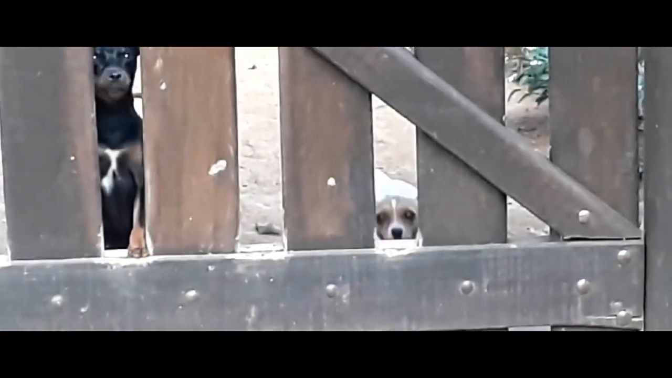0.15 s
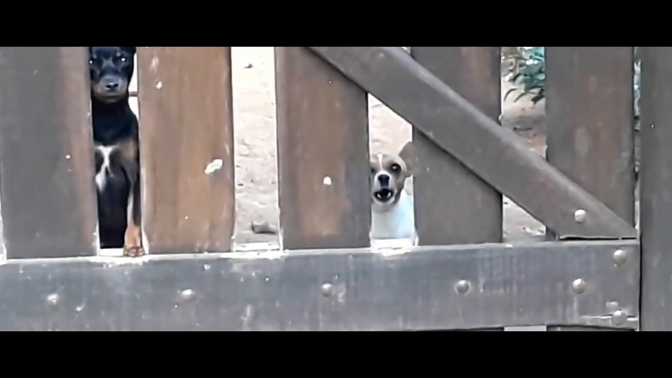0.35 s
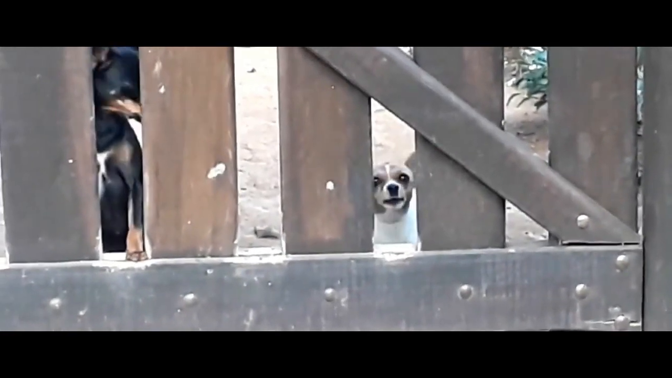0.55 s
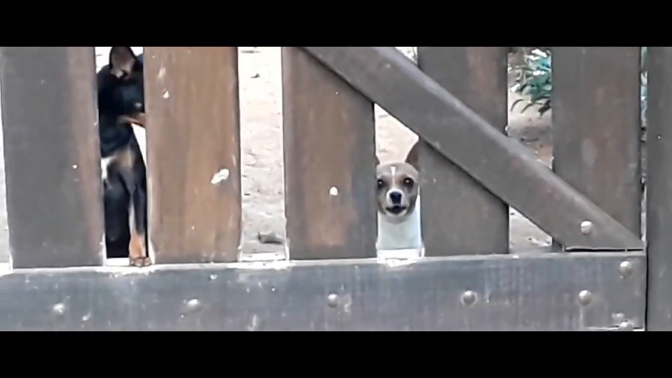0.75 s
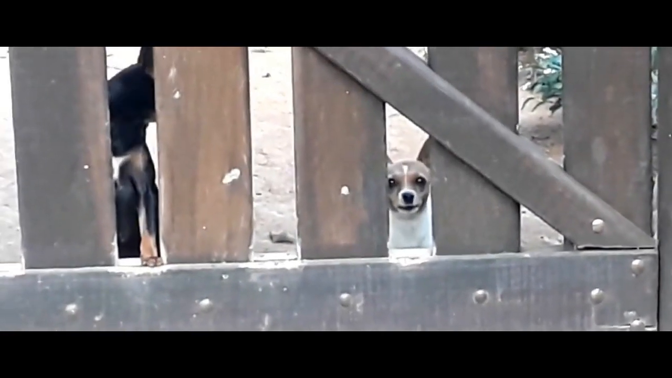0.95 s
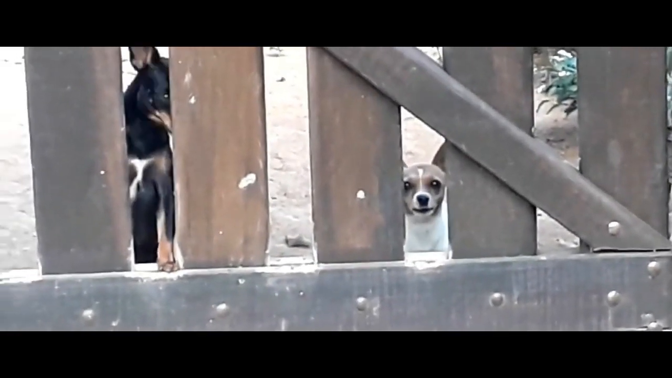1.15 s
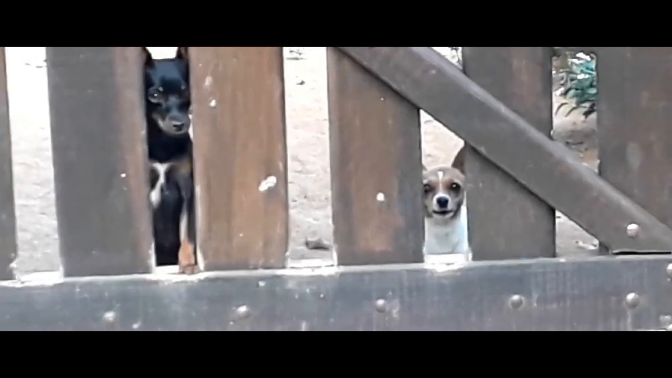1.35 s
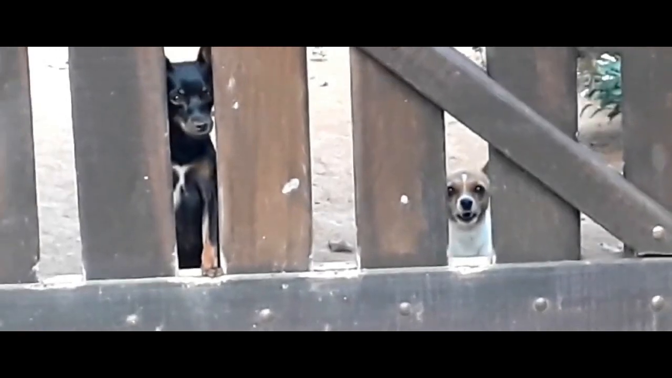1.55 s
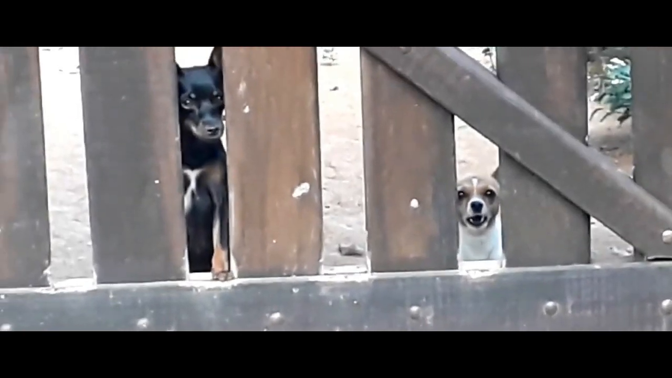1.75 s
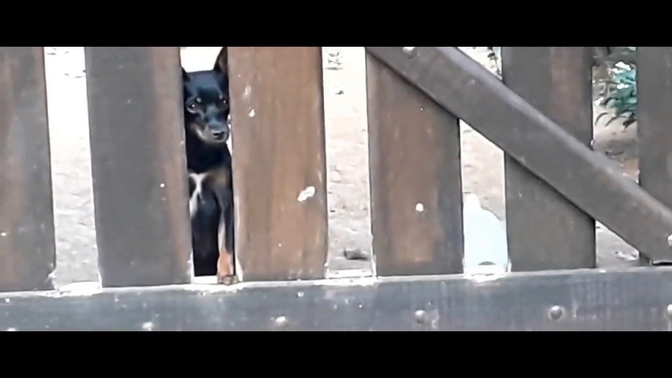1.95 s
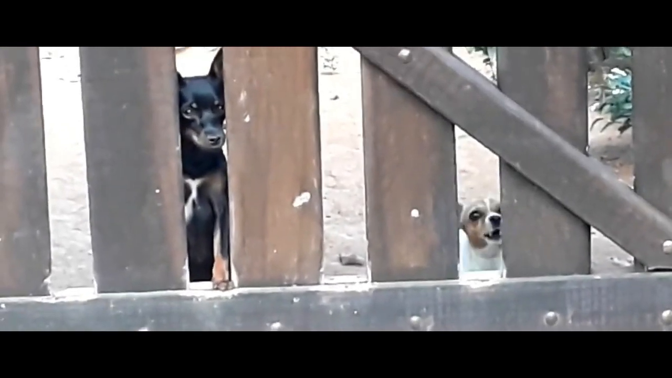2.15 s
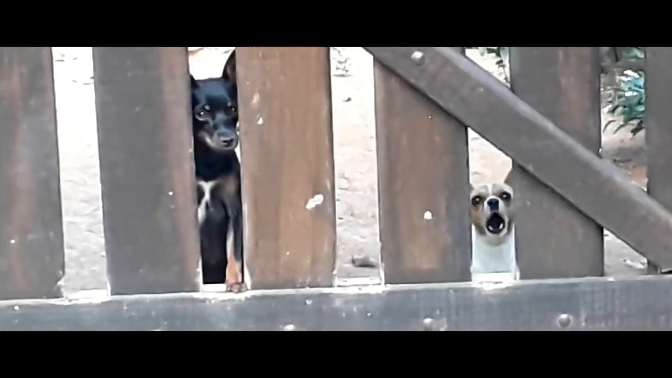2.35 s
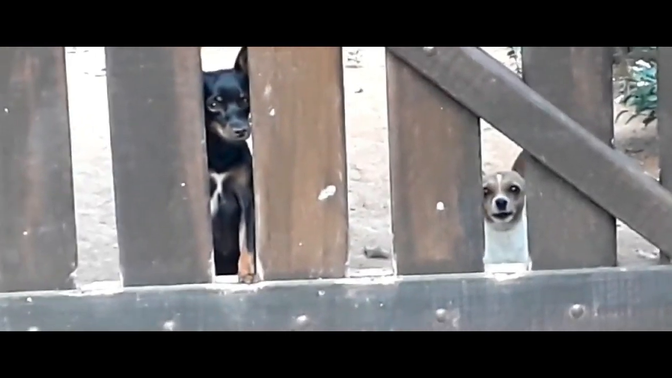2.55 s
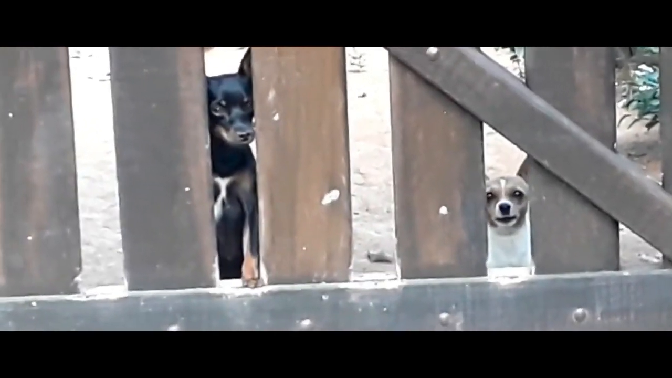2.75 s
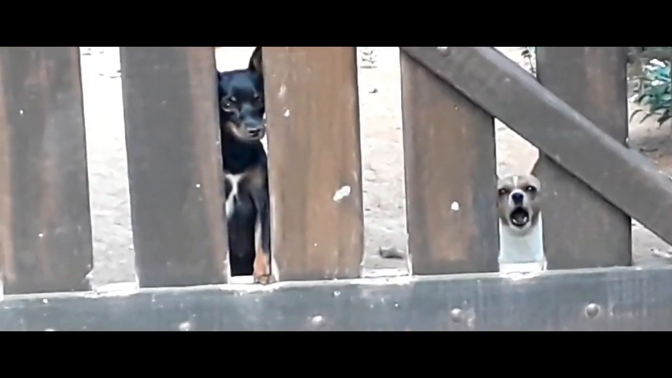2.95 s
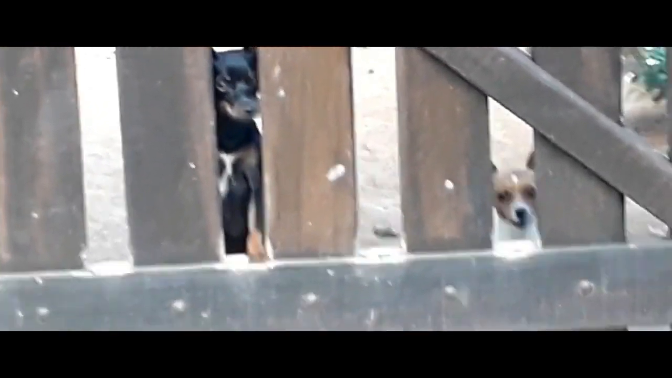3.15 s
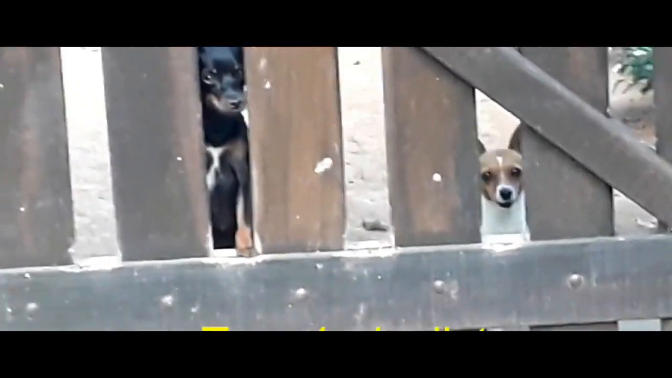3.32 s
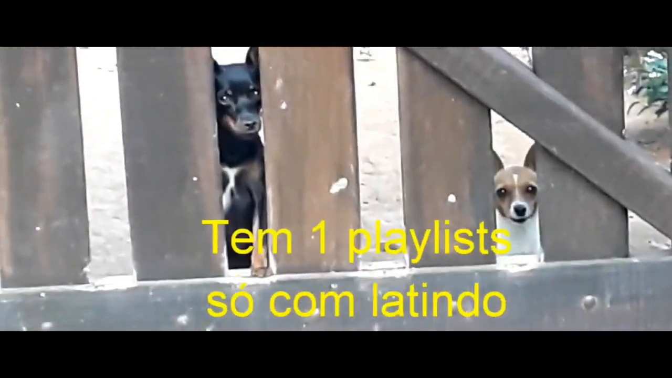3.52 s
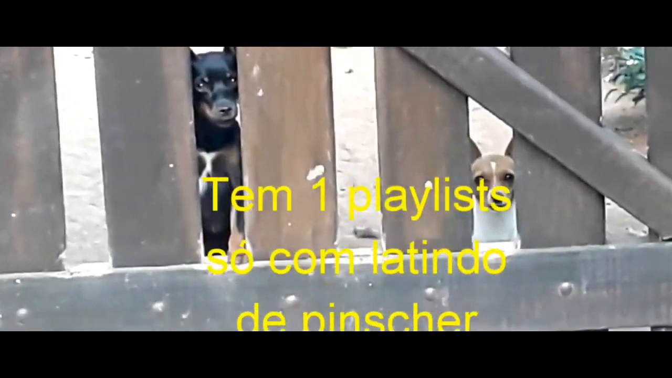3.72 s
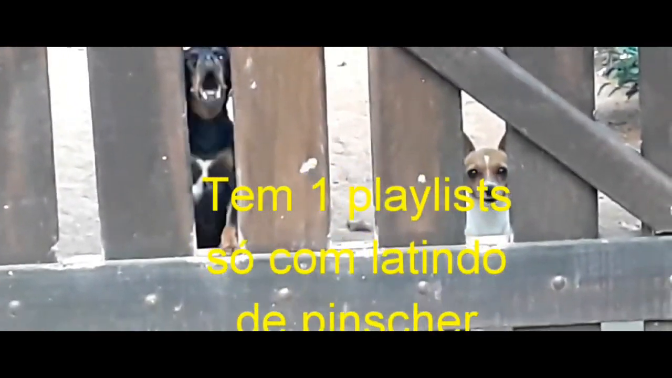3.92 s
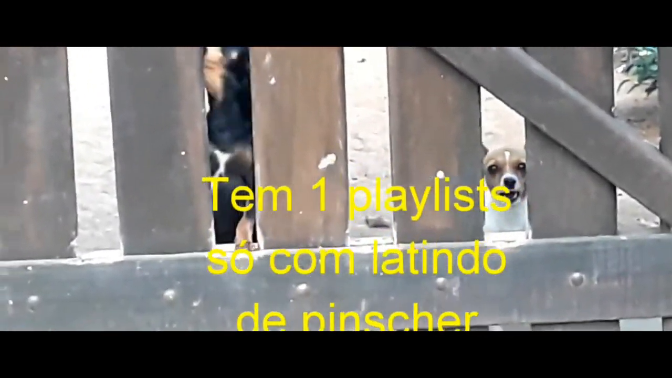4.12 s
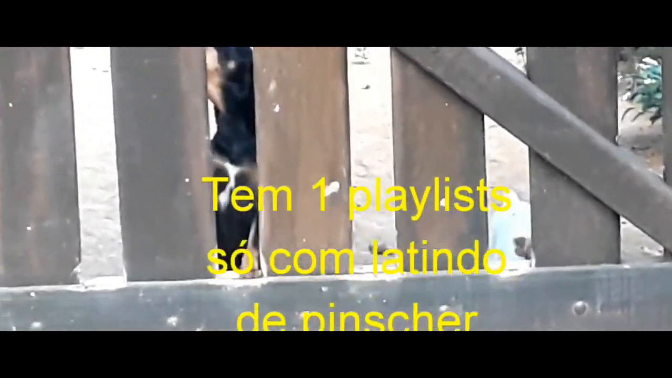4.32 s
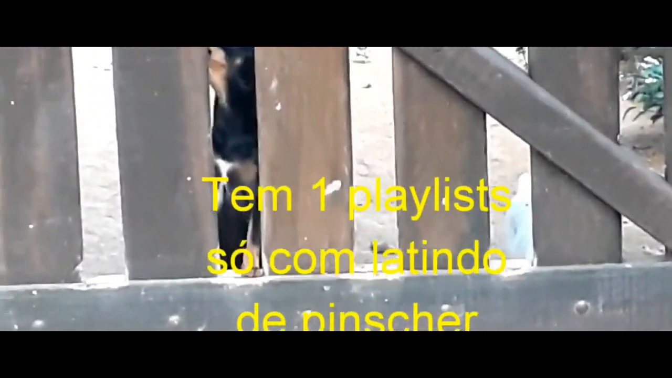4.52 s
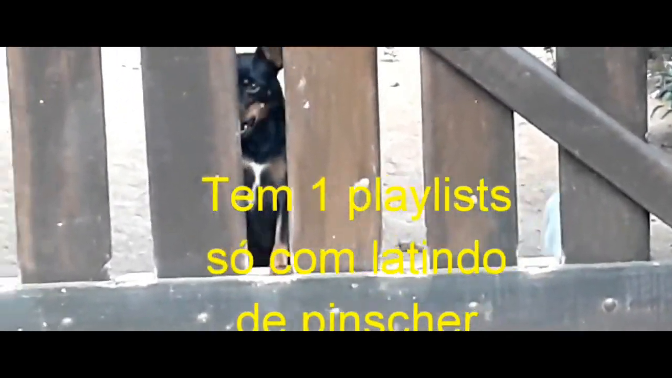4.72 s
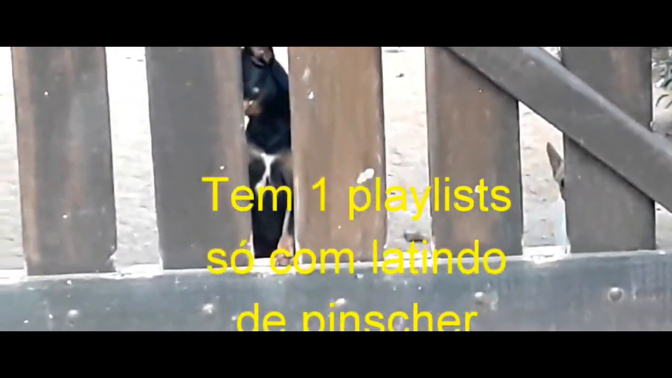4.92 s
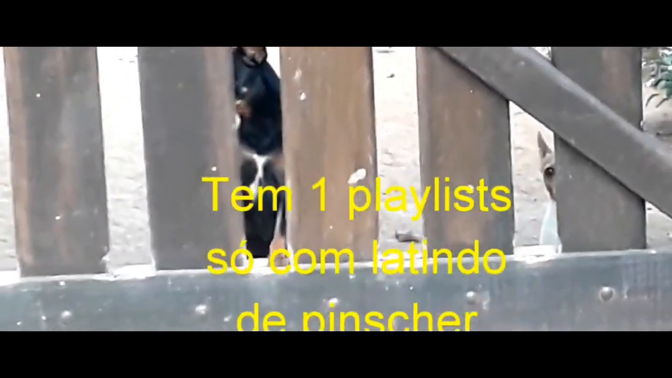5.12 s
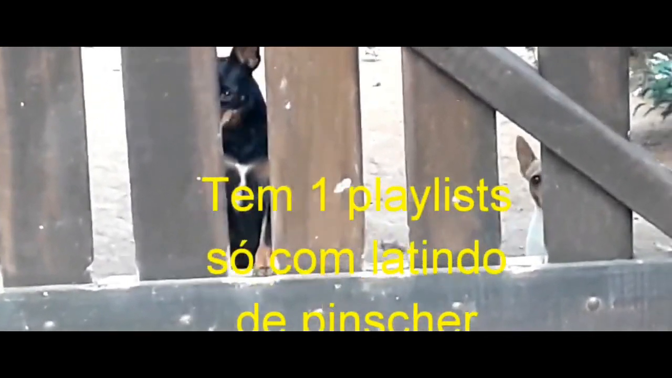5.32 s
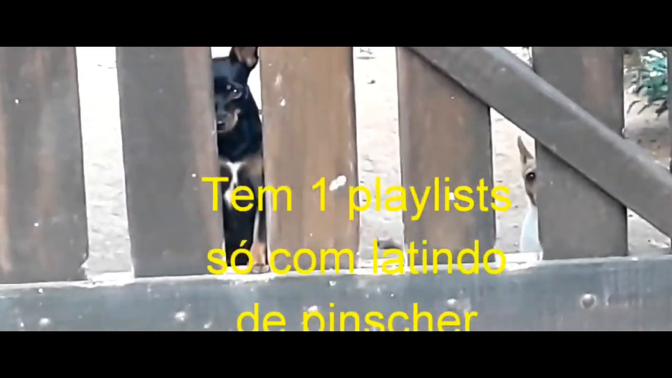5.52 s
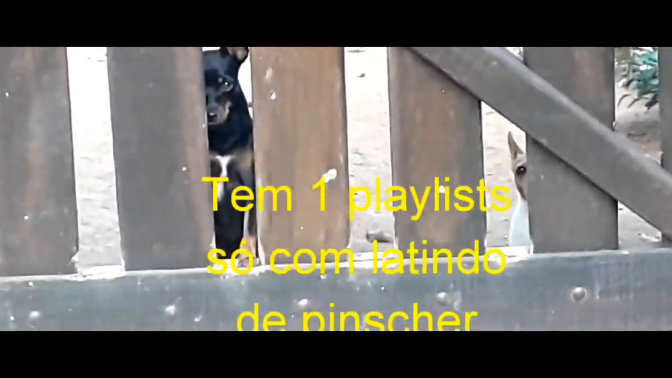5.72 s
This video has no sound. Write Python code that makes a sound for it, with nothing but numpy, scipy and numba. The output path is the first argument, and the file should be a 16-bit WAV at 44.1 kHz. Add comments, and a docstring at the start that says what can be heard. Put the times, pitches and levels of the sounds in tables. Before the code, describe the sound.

Two small dogs bark in a walled yard outdoors. Shrill yaps and rougher barks overlap at once, then the rough dog barks alone in separate bursts with faint growls between. A distant bird trills briefly. After a quieter gap with a single bark and small taps on wood, both dogs burst out again. Faint insects whine steadily near a soft hush; the microphone slightly flattens loud peaks.

```python
"""In a yard with a wooden gate, two small dogs bark: one growls between its arching barks, the other yaps higher.
Each voice stacks fluttering partials, a rasp of uneven pulses in throat and mouth, and patchy breath noise.
Walls throw back the dogs, the paw taps on wood, thin hisses, sliding insect notes and a trilling bird.
Insects sing near 5 kHz as throbbing tones and noise bands, over filtered noise for the hush and a low murmur.
The recorder thins the deep bass, flattens the loudest barks and cuts the top."""
import sys
import numpy as np
from scipy import signal
from scipy.fft import rfft, irfft, next_fast_len
from scipy.io import wavfile
from scipy.ndimage import uniform_filter1d
from numba import njit

SR = 44100
rng = np.random.default_rng(int(sys.argv[2]) if len(sys.argv) > 2 else 0)


def master_out(mix):
    """Clip the mix to full scale and print it as 16-bit PCM to the path in sys.argv[1]."""
    frames = np.transpose(np.atleast_2d(mix))
    ceiling = np.clip(frames, -1, 1)
    pcm = np.round(ceiling * 32767).astype(np.int16)
    wavfile.write(sys.argv[1], SR, pcm)


N = 254456


def from_db(db):
    """Decibels to a linear gain."""
    return 10 ** (np.asarray(db) / 20)


def rms_one(x):
    """Scale to an rms of 1."""
    return x / np.sqrt(np.mean(x ** 2) + 1e-20)


def in_time(rows):
    """Columns of a curve table, drawn as straight lines sample by sample."""
    s, *columns = np.transpose(rows)
    return [np.interp(np.arange(N) / SR, s, column) for column in columns]


def colour(x, spectrum):
    """Filter by a (Hz, dB) spectrum; rms 1."""
    size = next_fast_len(N)
    hz, db = np.transpose(spectrum)
    f = np.maximum(np.fft.rfftfreq(size, 1 / SR), 1)
    gain = from_db(np.interp(np.log(f), np.log(hz), db))
    return rms_one(irfft(rfft(x, size) * gain, size)[:N])


def drift(rate_hz):
    """Random wandering slower than the given rate; rms 1."""
    lowpass = signal.butter(2, rate_hz, fs=SR, output="sos")
    return rms_one(signal.sosfilt(lowpass, rng.standard_normal(N)))


def band(hz, width_hz):
    """Noise in a steep-edged band; rms 1."""
    edges = [hz - width_hz / 2, hz + width_hz / 2]
    bandpass = signal.butter(3, edges, "band", fs=SR, output="sos")
    return rms_one(signal.sosfilt(bandpass, rng.standard_normal(N)))


def evened(x):
    """Slow level changes divided out."""
    return x / np.sqrt(np.abs(uniform_filter1d(x ** 2, size=1500)) + 1e-9)


def swell(s, length):
    """Indices and a smooth rise and fall for one short event."""
    at = np.arange(int(s * SR), int((s + length) * SR))
    return at, np.hanning(len(at)) ** .5


def sweeps(notes):
    """Sine notes (s, length s, start Hz, end Hz, dB) that glide in pitch while their level warbles."""
    out = np.zeros(N)
    warble = from_db(4.4 * drift(105))
    for s, length, start_hz, end_hz, db in notes:
        at, shape = swell(s, length)
        turns = np.cumsum(np.linspace(start_hz, end_hz, len(at))) / SR
        out[at] += from_db(db) * shape * warble[at] * np.sin(2 * np.pi * turns)
    return out


@njit
def resonate(x, w, r):
    """Two-pole resonance whose centre can move; gain 1 on top."""
    y = np.zeros(len(x))
    for i in range(2, len(x)):
        y[i] = (1 - r * r) / 2 * (x[i] - x[i - 2]) + 2 * r * np.cos(w[i]) * y[i - 1] - r * r * y[i - 2]
    return y


def voice_partials(hz, turns, first_db, octave_db, lift_db, partials, flutter_db):
    """Six fluttering harmonics of the vocal folds; the upper four light up in the head's resonances."""
    tone = np.sin(2 * np.pi * turns) * from_db(first_db + flutter_db * drift(70))
    tone += np.sin(4 * np.pi * turns) * from_db(octave_db + 1.7 * flutter_db * drift(40))
    # the folds slacken while the pitch drops, and the upper partials fade
    falling = np.clip(-np.gradient(np.log(hz)) * SR, 0, 30)
    lead_db = lift_db + np.maximum(first_db, octave_db) - 1.6 * falling
    head_hz, head_db = np.transpose(partials)
    for k in range(3, 7):
        upper_db = lead_db + np.interp(np.log(k * hz), np.log(head_hz), head_db)
        tone += np.sin(2 * np.pi * k * turns) * from_db(upper_db + 2.0 * flutter_db * drift(44))
    return np.sqrt(2) * tone


def throat_rasp(turns, mouth_hz, throat, half, mouth_width_hz, mouth_db, ring_hz, ring_width_hz, sharp):
    """Uneven fold pulses: a rasp coloured by throat and moving mouth, and a ring in a fixed resonance."""
    # closings of the folds vary in strength over a few cycles; strong-weak pairs leave half-pitch lines
    cycle = (turns + .5).astype(int)
    even, odd = signal.lfilter([1], [1, -.72], rng.standard_normal((2, N)))[:, cycle]
    strength = even + half * odd * (-1.) ** cycle
    # each pulse lasts a share of its cycle, so the rasp brightens as the pitch climbs
    pulses = np.exp(sharp * (np.cos(2 * np.pi * turns) - 1))
    rasp = colour(strength * pulses, throat)
    ring_w, ring_r = np.full(N, 2 * np.pi * ring_hz / SR), np.exp(-np.pi * ring_width_hz / SR)
    ring = evened(resonate(resonate(rasp, ring_w, ring_r), ring_w, ring_r))
    mouth_w, mouth_r = 2 * np.pi * mouth_hz / SR, np.exp(-np.pi * mouth_width_hz / SR)
    rasp = rasp + from_db(mouth_db) * resonate(rasp, mouth_w, mouth_r)
    return evened(rasp), ring


def breath_hiss():
    """Air past the teeth: turbulence in patches, each part of the treble on its own, plus narrow whistles."""
    # Spectrum laid over the patches. Each row: frequency in Hz, gain in dB.
    breath_spectrum = [(2650, -28), (4500, -7), (5110, -5), (5680, -9), (7090, -13), (7400, -21),
                       (8910, -7.5), (11500, -14.5), (14200, -17), (15900, -22.5)]
    # Narrow whistles. Each row: centre in Hz, width in Hz, mean level in dB against the hiss.
    teeth_whistles = [(4980, 17, -17.5), (8200, 28, -23.5), (8600, 71, -30.5), (8750, 120, -35),
                      (11000, 50, -27.5), (13320, 78, -29.5)]
    patch_db = 3.5
    patches = np.zeros(N)
    for f in np.geomspace(4200, 15500, num=6):
        patches += from_db(patch_db * np.clip(drift(31), -2, 2)) * band(f, .3 * f)
    breath = colour(signal.lfilter([1, -.6], [1], patches), breath_spectrum)
    for f, width_hz, db in teeth_whistles:
        breath += from_db(db + 5.1 * drift(20)) * band(f, width_hz)
    return breath


def dog(voice, partials, jitter, flutter_db, hoarse, **rasp_settings):
    """One dog's voice: partials, rasp, throat ring and breath all follow its pitch and level curves."""
    # smoothing over 300 samples rounds the corners of every curve
    hz, mouth_hz, lift_db, *gains = uniform_filter1d([*voice[:3], *from_db(voice[3])], size=300)
    first_db, octave_db, rasp_db, breath_db, ring_db = 20 * np.log10(np.abs(gains) + 1e-9)
    # a hoarse call has weak upper partials and an unsteady pitch
    unsteady = jitter * from_db(-hoarse * lift_db) * drift(250)
    turns = np.cumsum(hz * (1 + unsteady)) / SR
    tone = voice_partials(hz, turns, first_db, octave_db, lift_db, partials, flutter_db)
    rasp, ring = throat_rasp(turns, mouth_hz, **rasp_settings)
    return tone + from_db(rasp_db) * rasp + from_db(ring_db) * ring + from_db(breath_db) * breath_hiss()


def shrill_voice():
    """Octave, breath and ring follow the rasp; mouth and brightness jump once the pitch passes the break."""
    # One list of rows per yap. Each row: time in seconds, pitch in Hz, fundamental in dB, rasp in dB.
    yaps = [
        [(0.0, 1597, -15, -11), (0.028, 1647, -21, -23), (0.04, 1680, -11.5, -25.5), (0.05, 1436, -22, -15.5),
         (0.06, 1191, -38, -11), (0.072, 977.4, -9.5, -23), (0.09, 790.5, -20, -25), (0.11, 599.3, -28, -58)],
        [(0.16, 754.3, -28, -42), (0.186, 910.8, -20.5, -27), (0.196, 984.4, -1.5, -37),
         (0.214, 1086, -3.5, -24), (0.224, 1348, -23, -26.5), (0.25, 1567, -5.5, -31.5),
         (0.268, 1629, -18, -30.5), (0.284, 1040, -8.5, -29), (0.31, 883, -17, -33)],
        [(0.36, 1161, -31, -32), (0.426, 1424, -16, -24), (0.444, 1313, -18.5, -32.5), (0.49, 1001, -27.5, -48)],
        [(4.145, 849.5, -56.5, -86), (4.168, 1011, -18.5, -32), (4.182, 1121, -4, -15.5),
         (4.205, 1220, -13.5, -15.5), (4.218, 1546, -16, -15.5), (4.236, 1748, -11, -18.5),
         (4.25, 1648, -18, -17), (4.292, 899.7, -35, -12), (4.32, 773.3, -19.5, -56)],
        [(4.345, 810.7, -41, -55), (4.365, 893.6, -8.5, -17), (4.389, 1070, -6, -14),
         (4.405, 1129, -19.5, -19.5), (4.418, 1432, -10, -28), (4.439, 1519, -4.5, -32),
         (4.461, 1515, -13.5, -27), (4.485, 841, -15.5, -26), (4.51, 682.8, -27, -37)],
        [(4.585, 847.7, -24.5, -31), (4.6, 902, -9.5, -55), (4.63, 1086, -3.5, -27), (4.65, 1134, -8, -43.5),
         (4.662, 1470, -13.5, -39.5), (4.681, 1510, -15, -49), (4.701, 1474, -11, -43.5),
         (4.722, 960, -19, -29.5), (4.76, 736, -36.5, -31)],
    ]
    # One row per yap: octave, breath and throat ring in dB against the rasp (octave and breath before their
    # sags), then mouth resonance in Hz and lift of the upper partials in dB, both after the break.
    yap_colours = [(3, -2.5, -7.5, 1600, 6.5), (3.5, 2.5, -1, 2000, -5.5), (-5, -8, -9.5, 1150, -3),
                   (-3, -4.5, -8, 1737, 15.5), (-9.5, -5, -11, 1700, -6), (13, 6, -3.5, 1430, 7.5)]
    # before the break the voice is almost a pure tone
    break_hz, chest_mouth_hz = 1270, 1040
    chest_upper_db, chest_octave_db = -20, -8
    # loss per octave: breath under the yap's top pitch, octave partial under the highest pitch so far
    breath_sag_db, octave_sag_db = 18, 35
    hz, first_db, rasp_db = in_time(np.concatenate(yaps))
    mouth_hz, lift_db = np.full(N, float(chest_mouth_hz)), np.full(N, float(chest_upper_db))
    levels = np.full((5, N), -120.)  # silent between yaps
    for yap, (octave_db, breath_db, ring_db, head_mouth_hz, head_lift_db) in zip(yaps, yap_colours):
        at = np.arange(int(yap[0][0] * SR), int(yap[-1][0] * SR))
        highest_hz = np.maximum.accumulate(hz[at])
        breath_db = breath_db + breath_sag_db * np.log2(hz[at] / hz[at].max())
        octave_db = octave_db + octave_sag_db * np.log2(hz[at] / highest_hz)
        octave_db = octave_db + chest_octave_db * (highest_hz < break_hz)
        rasp = rasp_db[at]
        levels[:, at] = [first_db[at], rasp + octave_db, rasp, rasp + breath_db, rasp + ring_db]
        broken = at[highest_hz > break_hz]
        mouth_hz[broken], lift_db[broken] = head_mouth_hz, head_lift_db
    return hz, mouth_hz, lift_db, levels


def shrill_dog():
    """The higher dog: sharp fold pulses and a narrow mouth resonance make thin, bright yaps."""
    # Head resonances. Each row: frequency in Hz, dB against the stronger low partial, before lift and fading.
    shrill_partials = [(2000, -21), (2700, -21.5), (3200, -19.5), (3900, -24.5), (4900, -18), (6000, -36),
                       (7500, -36.5), (10000, -38.5)]
    # Colour of the rasp. Each row: frequency in Hz, gain in dB.
    shrill_throat = [(150, -69), (250, -23.5), (632, -27.5), (1050, 5), (1370, -15), (1490, -10),
                     (1930, -6), (3110, -10), (3670, -36.5), (5090, -33), (6500, -47), (8450, -68),
                     (14300, -120)]
    return dog(shrill_voice(), shrill_partials, jitter=.006, flutter_db=4.0, hoarse=0,
               throat=shrill_throat, half=0.11, mouth_width_hz=120, mouth_db=-4,
               ring_hz=2667, ring_width_hz=430, sharp=17.0)


def insects():
    """A throbbing tone wanders around one pitch; fainter singers are bands of noise."""
    # Level of the main singer. Each row: time in seconds, level in dB.
    insect_levels = [(0, -69), (1.2, -62), (1.7, -64.5), (2.1, -62.5), (2.8, -72.5), (3.5, -66),
                     (4.1, -67.5), (5.77, -61)]
    # Fainter singers. Each row: pitch in Hz, width in Hz, level in dB against the main one.
    chorus = [(5725, 860, -8), (8813, 300, -14.5)]
    song_hz, wander_hz = 4880, 39.3
    turns = np.cumsum(song_hz + wander_hz * drift(3)) / SR
    throb = drift(70) + 0.1 * drift(300)
    song = np.sqrt(2) * np.sin(2 * np.pi * turns) * throb
    for hz, width_hz, db in chorus:
        song += from_db(db) * band(hz, width_hz)
    return from_db(in_time(insect_levels)[0] + 1.0 * drift(25)) * song


def outdoor_hush():
    """Steady open-air noise, filtered to its colour and barely wavering in level."""
    # Colour of the hush. Each row: frequency in Hz, gain in dB.
    air_spectrum = [(18, -46.5), (30, -33), (81, -7), (738, -10.5), (1070, -17), (1580, -10.5),
                    (1800, -8.5), (1950, -12), (2670, -13.5), (3660, -21.5), (5020, -14), (6530, -27.5),
                    (7060, -21), (7640, -27.5), (15900, -30)]
    level_db = -63 + 0.74 * drift(17)
    return from_db(level_db) * colour(rng.standard_normal(N), air_spectrum)


def low_murmur():
    """A fluttering band of low noise that swells and fades."""
    # Each row: time in seconds, level in dB before the flutter.
    murmur_levels = [(0.9, -57.5), (1.14, -63), (1.83, -49.5), (2.16, -56.5), (2.29, -49), (2.51, -45.5),
                     (2.84, -61), (3.0, -69), (4.0, -73.5), (4.12, -59), (4.8, -46), (5.012, -52.5),
                     (5.77, -53)]
    flutter_db = 3
    return from_db(in_time(murmur_levels)[0] + flutter_db * drift(36)) * band(380, 530)


def deep_voice():
    """The growl sets the ground; in a bark the pitch arches, the mouth opens and every layer swells."""
    # Growl between the barks. Each row: time in seconds, pitch in Hz, fundamental in dB, rasp in dB.
    growl = [(.4, 280.4, -90, -88.5), (.45, 294.9, -47.5, -23), (.62, 207.8, -46.5, -48),
             (.68, 250, -39.5, -57), (.85, 184.5, -49.5, -58), (.95, 198, -51, -64),
             (1.02, 234.4, -37.5, -38.5), (1.1, 206.4, -52, -58.5), (1.17, 196.7, -81, -80.5),
             (1.32, 204, -76.5, -78.5), (1.36, 194, -55, -69), (1.51, 187.8, -61, -71),
             (1.57, 198, -67.5, -67), (1.62, 197, -42, -45.5), (1.8, 195.5, -55.5, -56.5),
             (1.92, 197.7, -57, -77), (2.08, 186.7, -62, -65), (2.27, 204.5, -45.5, -49.5),
             (2.5, 206, -48.5, -51), (2.69, 189.7, -50, -50), (2.76, 178, -69, -65), (2.8, 180.7, -92, -93),
             (3.14, 183.9, -97.5, -89), (3.18, 200.6, -50.5, -70), (3.37, 214.8, -42.5, -44),
             (3.41, 178.7, -58, -56.5), (3.47, 176, -54.5, -58.5), (3.54, 177, -91.5, -79.5),
             (5.1, 200, -93.5, -88), (5.16, 214.6, -45.5, -54), (5.37, 293.2, -38, -26.5),
             (5.56, 215, -55, -49), (5.6, 178, -59.5, -73), (5.7, 205.3, -47, -49), (5.77, 197, -51, -60)]
    # Octave against the fundamental, then breath and throat ring against the rasp, in dB.
    growl_layers_db = [-10, -24, -2]
    # Each row: top of the bark in seconds, rise and fall in seconds, top pitch in Hz, open mouth resonance
    # in Hz, lateness of the octave's peak [-1 to 1], steepness of the climb [exponent], lateness of the
    # effort [-1 to 1], lift of the upper partials in dB, then peak dB of fundamental, octave (before
    # mistuning), rasp, breath and throat ring.
    barks = [(.33, 0.089, .11, 919.4, 1887, -0.095, 2.6, 0.14, 1.5, -24, -12.5, -12.5, -33.5, -29),
             (.55, 0.075, .07, 849.7, 1637, 0.04, 2.2, 0.12, 5.5, -29.5, -19.5, -13, -32.5, -31),
             (.775, 0.097, .065, 903.7, 1786, .1, 2.4, 0.12, -13, -27, -15, -14.5, -32.5, -17.5),
             (1.72, .1, .07, 541.1, 1280, -.1, 2.2, 0.051, -14.5, -39, -19, -26.5, -42.5, -29),
             (2.17, 0.072, .1, 930.5, 1730, 0.049, 2.8, -0.15, 4, -18.5, -15.5, -14.5, -33.5, -52.5),
             (2.37, 0.081, .1, 882.3, 1501, -0.19, 2.4, 0.065, -4, -24.5, -20, -15.5, -36.5, -22),
             (2.615, 0.093, .07, 744.8, 1465, -.2, 1.8, 0.036, -5.5, -33, -26.5, -21, -38.5, -17.5),
             (3.29, 0.096, .08, 945.3, 1908, 0.099, 2.4, -0.1, 4.5, -23, -14, -15.5, -33.5, -43.5),
             (4.59, 0.1, .09, 984.5, 1874, -0.082, 2.8, -0.13, 12.5, -22, -23.5, -12, -31.5, -21),
             (5.065, 0.082, .085, 958.8, 1907, .1, 2.8, -0.16, 11, -19.5, -16.5, -10, -30.5, -64),
             (5.31, .11, .06, 825.4, 1673, .2, 1.5, 0.12, -6, -32, -13, -22, -35.5, -34),
             (5.445, 0.088, .095, 663.4, 1296, 0.41, 2.4, -0.0067, -14.5, -36, -32, -16.5, -37, -27)]
    # How those five layers swell. Each row: place of the peak [-1 start, 1 end] before the bark's lateness,
    # dB down at the start, dB down at the end.
    swells = [(-0.043, 27, 27.5), (-0.52, 5.5, 41), (-0.031, 31.5, 34), (-0.27, 25.5, 26.5),
              (0.2, 27.5, 36.5)]
    swell_bend, shut_mouth_hz = 1.92, 1390
    arch_fall = 2.2  # the higher, the later the pitch drops
    arch_tail = 1.4  # above 1 the falling pitch lands gently
    mistuned_db = 24  # the octave's loss for each octave away from the open mouth resonance
    t = np.arange(N) / SR
    hz, tone_db, rasp_db = in_time(growl)
    octave_db, breath_db, ring_db = growl_layers_db
    levels = np.array([tone_db, tone_db + octave_db, rasp_db, rasp_db + breath_db, rasp_db + ring_db])
    usual, start_db, end_db = np.transpose(swells)[:, :, None]
    mouth, lift_db = [], np.zeros(N)
    for top, rise, fall, top_hz, open_hz, octave_late, climb, late, upper_db, *peaks_db in barks:
        at = np.flatnonzero((t > top - rise) & (t < top + fall))
        climbing = t[at] < top
        place = (t[at] - top) / np.where(climbing, rise, fall)  # -1 start, 0 top, 1 end
        arch = 1 - np.abs(place) ** np.where(climbing, climb, arch_fall)
        hz[at] += (top_hz - hz[at]) * arch ** np.where(climbing, 1, arch_tail)
        centre = np.clip(usual + late + [[0], [octave_late], [0], [0], [0]], -.9, .9)
        early = place < centre
        away = np.abs(place - centre) / np.where(early, 1 + centre, 1 - centre)
        swollen = np.array(peaks_db)[:, None] - np.where(early, start_db, end_db) * away ** swell_bend
        swollen[1] -= mistuned_db * np.abs(np.log2(2 * hz[at] / open_hz))
        levels[:, at] = np.maximum(levels[:, at], swollen)
        lift_db[at] = upper_db
        mouth += [(top - rise, shut_mouth_hz), (top, open_hz), (top + fall, open_hz)]
    return hz, in_time(sorted(mouth))[0], lift_db, levels


def deep_dog():
    """The lower dog: blunt pulses in strong-weak pairs and a loud mouth resonance give a rough bark."""
    # Head resonances. Each row: frequency in Hz, dB against the stronger low partial, before lift and fading.
    deep_partials = [(550, -2), (1100, -22.5), (1700, -19), (2300, -12.5), (2800, -18), (3400, -22.5),
                     (4200, -34.5), (5000, -43), (6000, -29.5)]
    # Colour of the rasp. Each row: frequency in Hz, gain in dB.
    deep_throat = [(150, -76.5), (250, -14.5), (474, -29.5), (786, -14), (900, -1), (1050, -9.5),
                   (1780, -1), (2830, -3), (3200, -13), (5090, -28.5), (6500, -23.5), (8450, -68),
                   (14300, -120)]
    return dog(deep_voice(), deep_partials, jitter=0.023, flutter_db=3.0, hoarse=0.59,
               throat=deep_throat, half=0.93, mouth_width_hz=240, mouth_db=13.5,
               ring_hz=1135, ring_width_hz=280, sharp=5.2)


def thin_hisses():
    """Short bands of noise that swell and fade."""
    # Each row: start in seconds, length in seconds, centre in Hz, width in Hz, level in dB.
    hisses = [(1.514, 0.46, 2700, 1600, -50.5), (0.915, 0.22, 8100, 890, -63),
              (1.63, 0.41, 9100, 1000, -58.5), (4.5, 0.32, 3100, 800, -53)]
    out = np.zeros(N)
    for s, length, hz, width_hz, db in hisses:
        at, shape = swell(s, length)
        out[at] += from_db(db) * shape * band(hz, width_hz)[at]
    return out


def paw_taps():
    """Paws on wood: dulled noise knocks that die away within milliseconds."""
    # Each row: start in seconds, peak in dB, low-pass corner in Hz.
    taps = [(1.08, -32.5, 3000), (3.405, -32.5, 9050), (3.748, -42.5, 2200), (3.799, -50, 700),
            (4.144, -26, 451.6)]
    out = np.zeros(N)
    fade = np.exp(-np.arange(800) / SR / .0027)  # decay constant in seconds
    for s, db, dull_hz in taps:
        knock = rng.standard_normal(800) * fade
        knock = signal.lfilter(*signal.butter(2, dull_hz, fs=SR), knock)
        start = int(s * SR)
        out[start:start + 800] += from_db(db) * knock / np.abs(knock).max()
    return out


def bird():
    """A far bird: single gliding notes, then a trill whose every turn slides up, then down."""
    # Each row: start in seconds, length in seconds, start pitch in Hz, end pitch in Hz, dB before warble.
    bird_notes = [(1.317, .03, 2800, 3300, -62.5), (1.441, .08, 3260, 3650, -61.5),
                  (1.577, .07, 2370, 3000, -57.5), (1.705, .02, 3500, 2797, -49.5)]
    # Start of each turn of the trill, in seconds.
    trill_starts = [1.776, 1.861, 1.937, 2.012]
    # Each row: delay in the turn and length in seconds, start and end pitch in Hz, dB before warble.
    trill_notes = [(0, .025, 2246, 3320, -50.5), (.024, 0.025, 3550, 2130, -48)]
    trill = [(s + delay, *note) for s in trill_starts for delay, *note in trill_notes]
    return sweeps(bird_notes + trill)


def insect_glides():
    """One insect's song slides upward as a warbling sine."""
    # Each row: start in seconds, length in seconds, start pitch in Hz, end pitch in Hz, dB before warble.
    glides = [(1.935, .2, 4920, 5320, -59.5), (2.999, 0.33, 4945, 5417, -64.5)]
    return sweeps(glides)


def yard(x):
    """A few distinct echoes, then diffuse tails that build up and die away, all dulled on the way back."""
    # Diffuse tails of near and far walls. Each row: time to fall 60 dB in seconds, level in dB before build-up.
    wall_tails = [(0.399, -12), (0.902, -29.5)]
    # Gate and walls. Each row: delay in seconds, level in dB before dulling.
    echoes = [(.011, -8), (0.025, -9), (0.036, -24.5), (.058, -19)]
    dull_hz = 7240
    t = np.arange(SR) / SR
    decay = sum(from_db(db - 60 * t / t60) for t60, db in wall_tails)
    build_up = np.clip(t / 0.092, 0, 1)
    response = rng.standard_normal(SR) * decay * build_up / np.sqrt(0.044 * SR)
    for s, db in echoes:
        response[int(s * SR)] += from_db(db)
    response = signal.lfilter(*signal.butter(1, dull_hz, fs=SR), response)
    return x + signal.fftconvolve(x, response)[:N]


def scene():
    """Dogs and small sounds echo in the yard, over the background of hush, murmur and insects."""
    dogs = shrill_dog() + deep_dog()
    small_sounds = thin_hisses() + paw_taps() + bird() + insect_glides()
    background = outdoor_hush() + low_murmur() + insects()
    return (yard(dogs + small_sounds) + background)[None]


def record(dry):
    """The microphone loses the deep bass, loud peaks flatten against full scale, the top is cut."""
    drive_db, knee, cutoff_hz = 2.5, 8, 16200  # the higher the knee, the more sudden the flattening
    x = from_db(drive_db) * signal.lfilter(*signal.butter(1, 80, "high", fs=SR), dry)
    x = x / (1 + np.abs(x) ** knee) ** (1 / knee)
    lowpass = signal.cheby2(20, 50, cutoff_hz, fs=SR, output="sos")
    return np.clip(signal.sosfilt(lowpass, x), -1, 1)


dry = scene()
out = record(dry)
master_out(out)
```